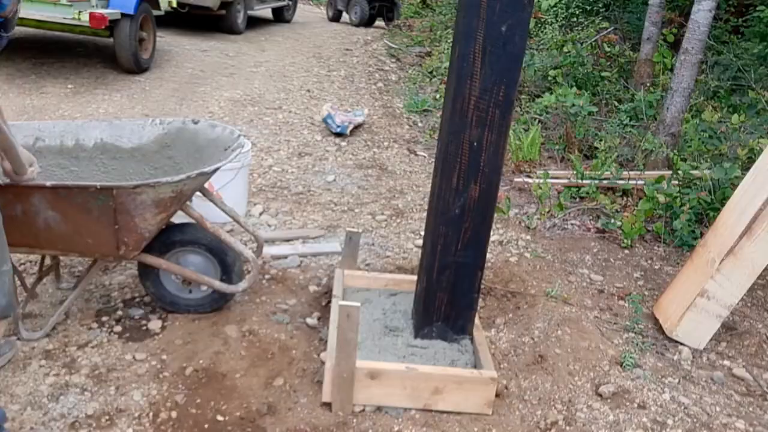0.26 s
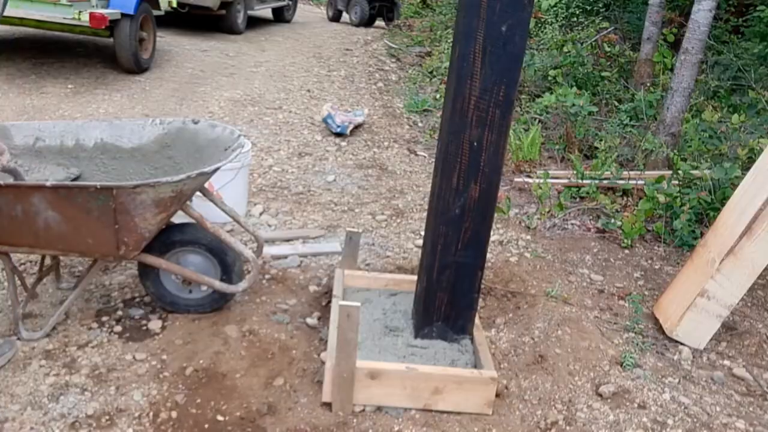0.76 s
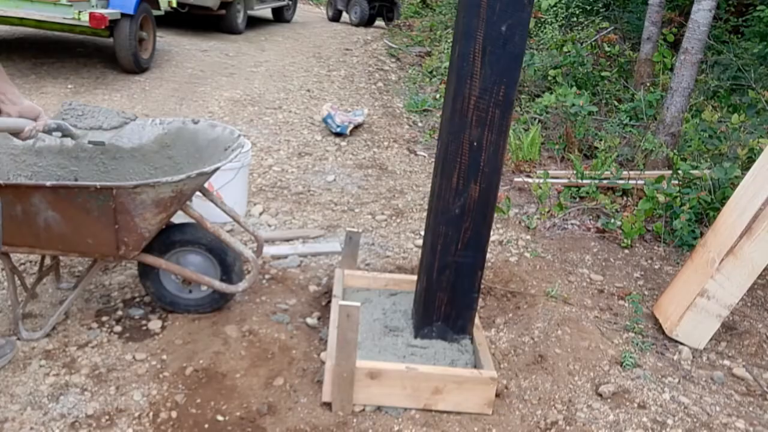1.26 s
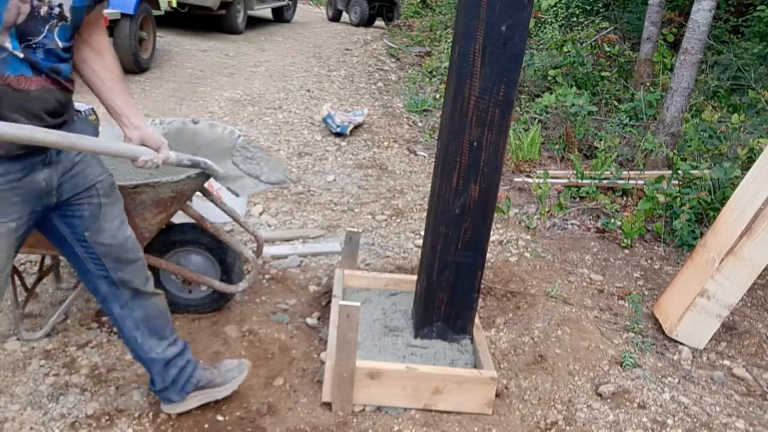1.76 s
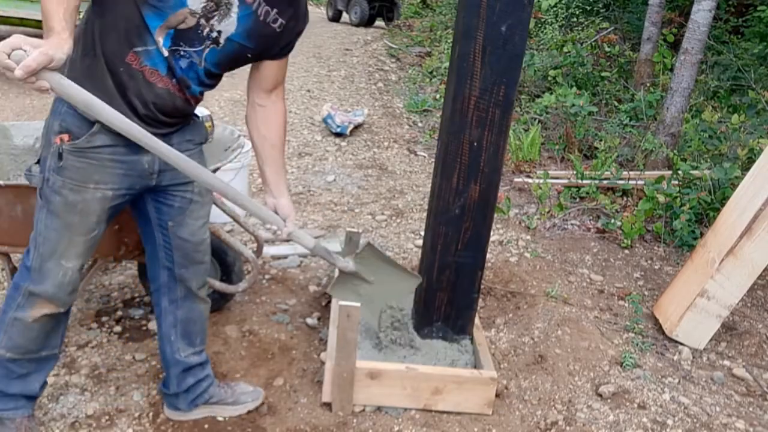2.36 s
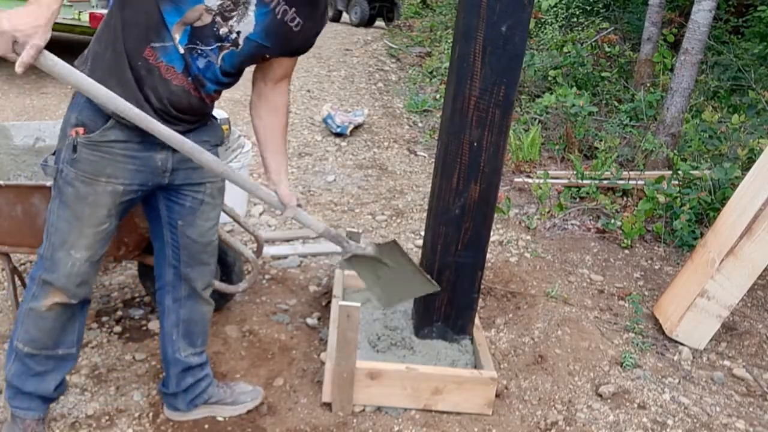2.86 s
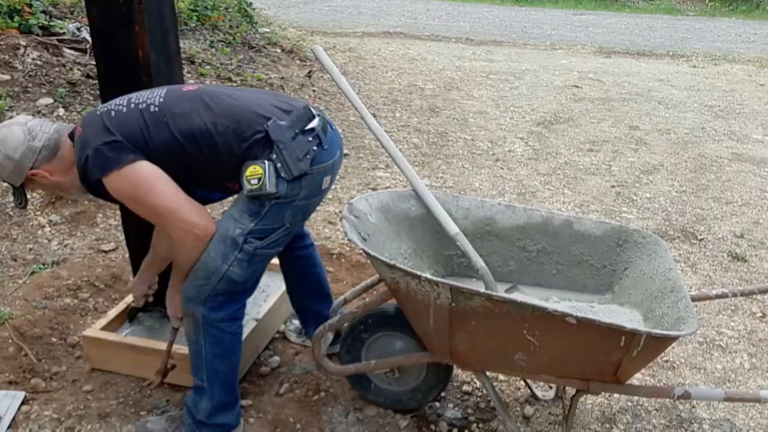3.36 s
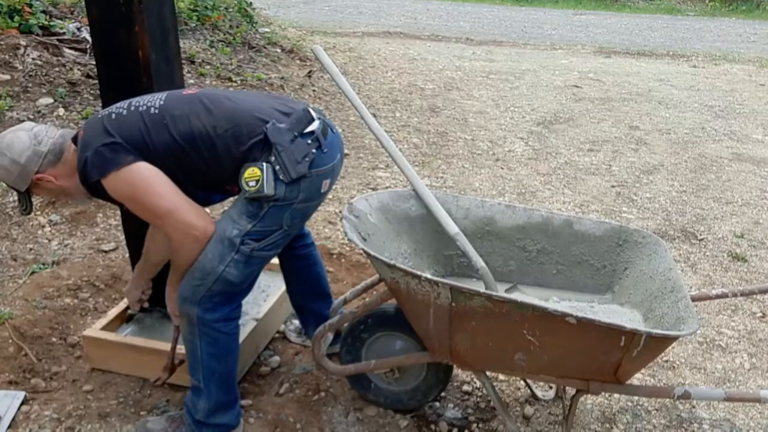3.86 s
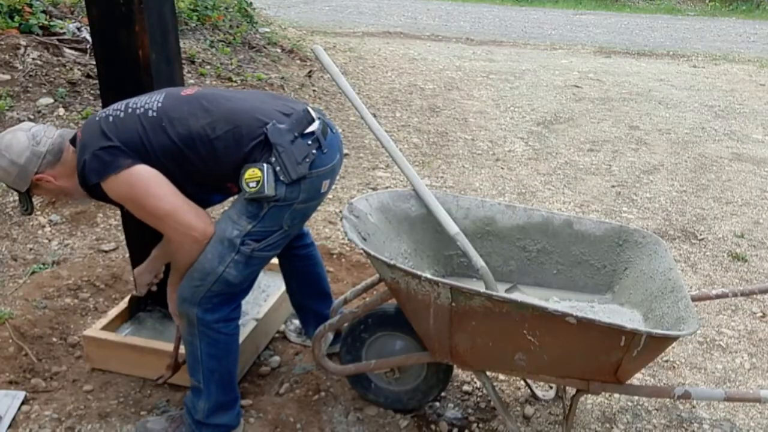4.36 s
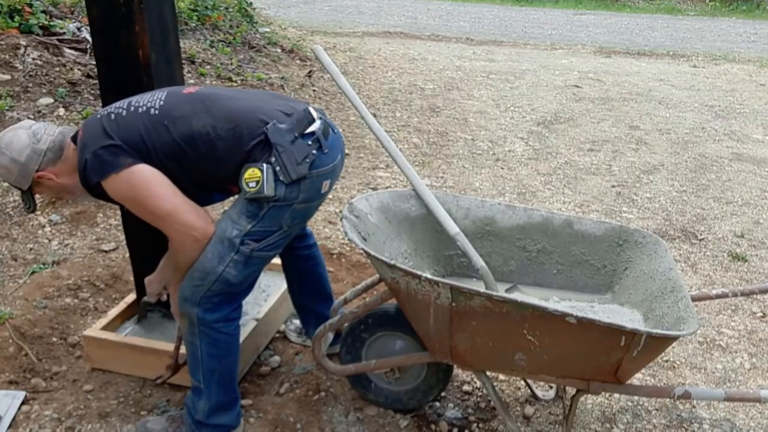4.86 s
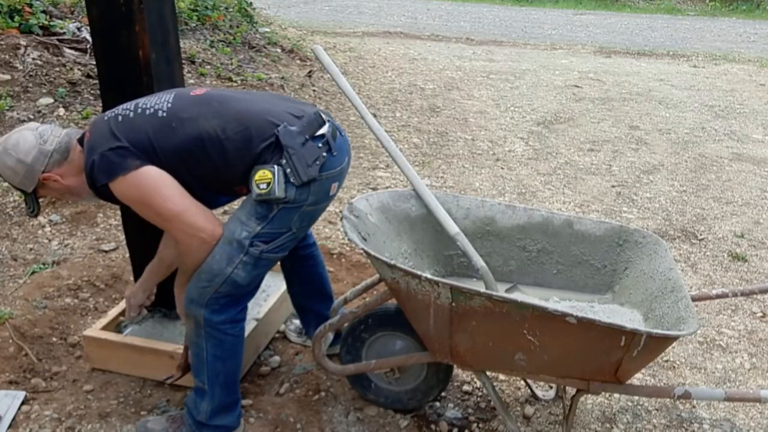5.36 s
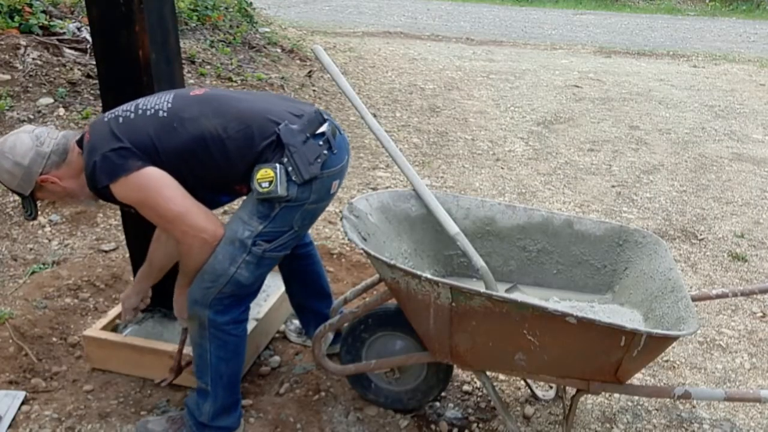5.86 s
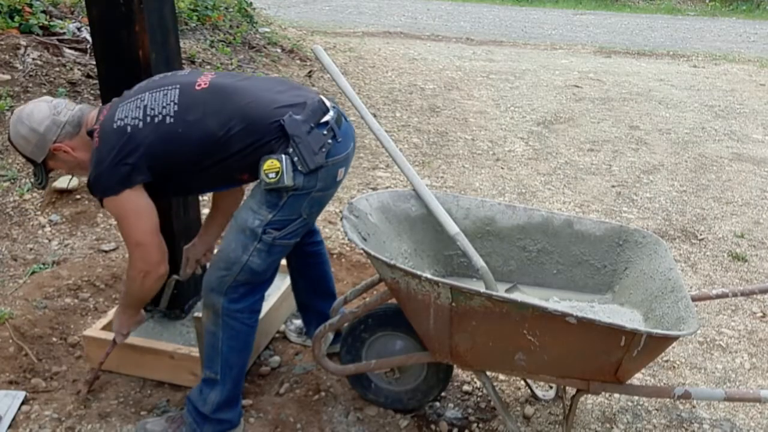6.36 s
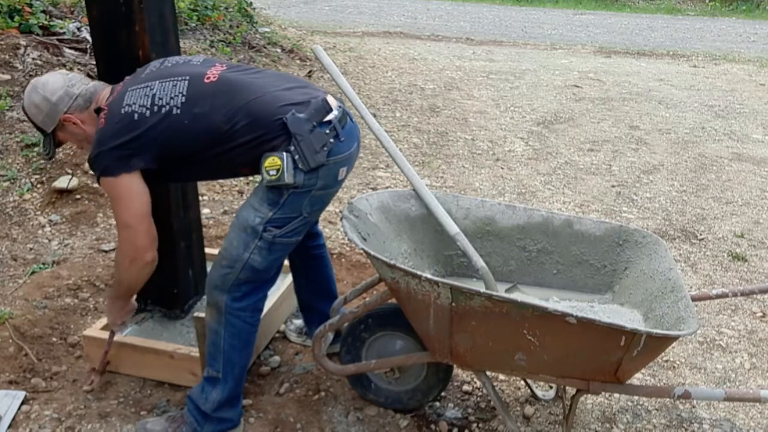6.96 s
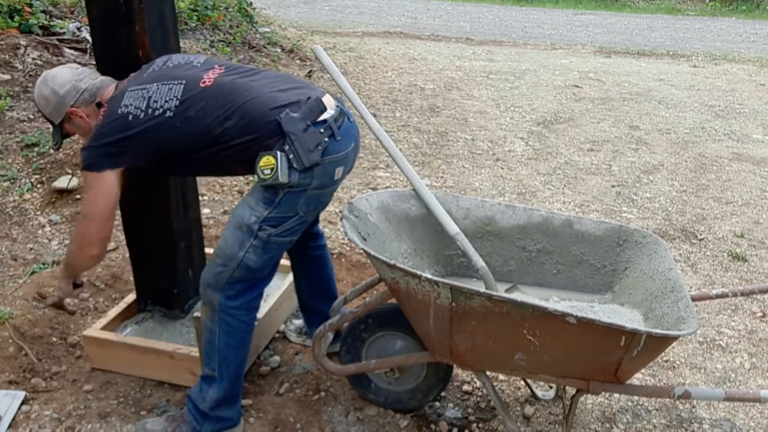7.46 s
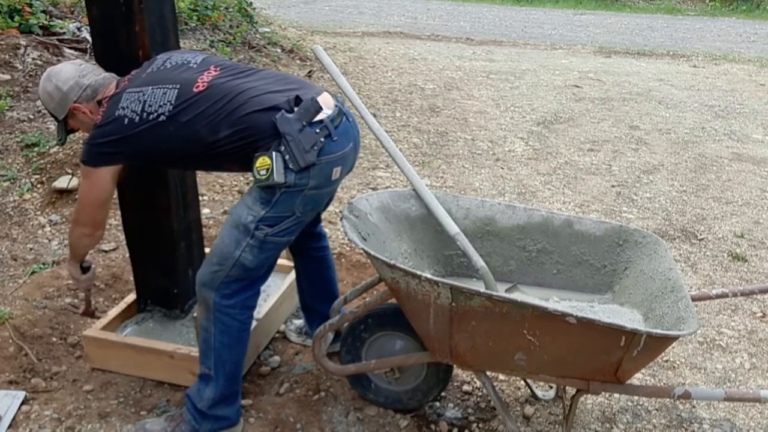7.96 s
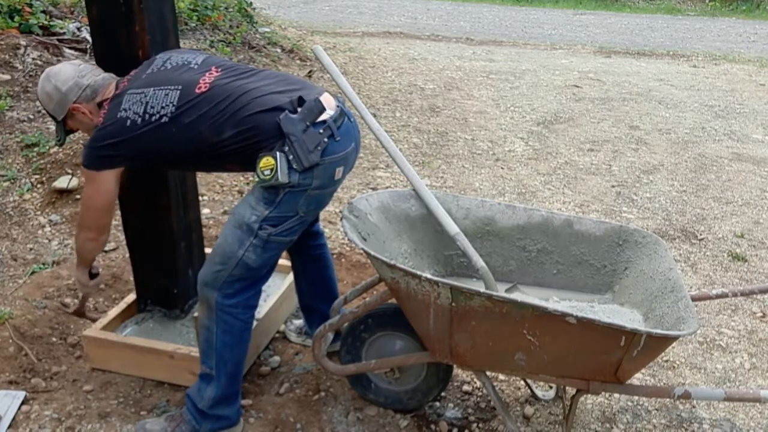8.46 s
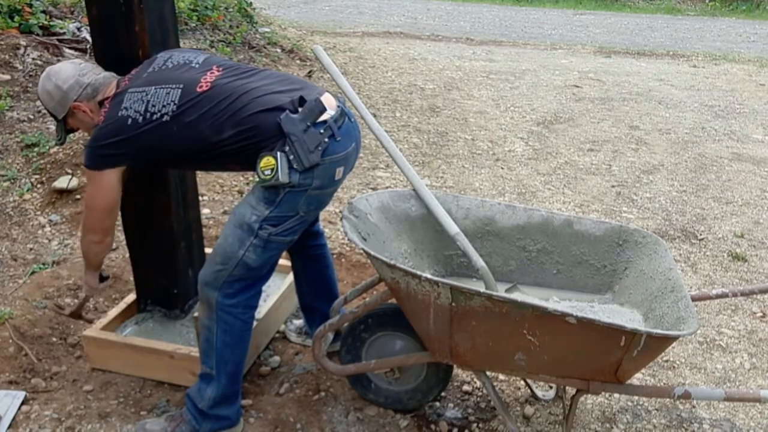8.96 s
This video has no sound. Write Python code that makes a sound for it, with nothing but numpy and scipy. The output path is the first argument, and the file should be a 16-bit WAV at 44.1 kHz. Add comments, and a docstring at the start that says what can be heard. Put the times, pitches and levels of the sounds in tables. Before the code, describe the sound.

Outdoors, close to the work, over a steady soft background noise. From 0 to 2 s a shovel digs wet concrete in a steel wheelbarrow: two gritty, boomy pushes at once, dull knocks around 0.6-0.9, scattered stone ticks, wet slops, and a sharp scrape at 1.8. Low wind puffs buffet the microphones, strongest near 2.3 and 3.15. The load slides off wetly around 2.3-2.5; the blade grates and clanks brightly at 3.1-3.27. At 3.4 the position changes abruptly, wind stops and a faint far engine hums. A steel bar stirs until about 6.1 in quick sandy hisses with coarse rattles and ticks, sparser near 5. It taps a side board from 6.3 to 7.15, five firm, woody knocks about 0.2 apart with a tiny rebound. From 7.75 to 9.1, seven taps on the end board add low thuds and occasional faint ringing. Short echoes follow; the hum swells slightly.

```python
"""Wet concrete work outdoors, heard from two positions. First a shovel digs in a steel wheelbarrow, with wind:
shaped noise rubs and booms, the load slides off and contact noise rings modes of the blade in the form.
Then a far engine hums in sine partials and a steel bar is stirred in the mix: noise strokes hiss and rattle.
Last, the bar taps two boards of the wooden form: short blows excite damped modes, the second board with thuds.
Steady noise lies under all; nearby trees and ground return short echoes as decaying noise tails."""
import sys
import numpy as np
from scipy import signal
from scipy.fft import rfft, irfft, next_fast_len
from scipy.io import wavfile
from scipy.ndimage import uniform_filter1d, map_coordinates

SR = 44100
rng = np.random.default_rng(int(sys.argv[2]) if len(sys.argv) > 2 else 0)


def pcm_store(signal):
    """Save signal as 16-bit PCM."""
    levels = np.round(np.clip(np.atleast_2d(signal), -1, 1) * 32767)
    wavfile.write(sys.argv[1], SR, levels.astype(np.int16).T)


N = 405279

CUT = 3.39  # the listening position changes here (s)
# Wet, heavy body of the mix: f/Hz, relative spectral density/dB
SLOP = [(90, -29), (170, -8), (240, -7.5), (380, -16.5), (800, -64)]
# Taps on the end board: t/s, blow level before the board/dB, nominal ring of the bar relative to the blow/dB
END_TAPS = [(7.741, -13.5, -60), (7.99, -11, -66), (8.22, -15, -53), (8.429, -13.5, -54), (8.64, -15, -48),
            (8.862, -12.5, -40.5), (9.1, -17, -51.5)]


def amp(db):
    """Level law: amplitude ratio of a level in dB."""
    return 10 ** (np.asarray(db) / 20)


def unit(x):
    """Normalisation by energy: x at rms 1."""
    return x / np.sqrt(np.mean(x ** 2) + 1e-20)


def along(points, hz):
    """Interpolation on a logarithmic pitch axis of (f/Hz, value) points."""
    f, v = np.transpose(points)
    return np.interp(np.log(hz + 1), np.log(f + 1), v)


def curves(rows):
    """Linear interpolation in time: one curve for each column, -120 outside the table."""
    s, *cols = np.transpose(rows)
    return [np.interp(np.arange(N) / SR, s, c, -120, -120) for c in cols]


def wobble(rate):
    """Band-limited random modulation: a smooth curve with rate knots a second."""
    knots = rng.standard_normal(int(N * rate / SR) + 4)
    return map_coordinates(knots, [np.arange(N) * rate / SR])


def filtered(x, response):
    """Convolution theorem: the spectrum of x times a complex frequency response."""
    m = next_fast_len(N + SR // 2)
    return irfft(rfft(x, m) * response(np.fft.rfftfreq(m, 1 / SR)), m)[..., :N]


def coloured(x, spectrum):
    """Minimum-phase filtering: x through the causal filter of this spectrum, energy gain 1."""
    size = 4096
    magnitude = amp(along(spectrum, np.fft.rfftfreq(size, 1 / SR)))
    cepstrum = irfft(np.log(magnitude + 1e-5))
    cepstrum[1:size // 2] *= 2  # fold the cepstrum onto positive time
    cepstrum[size // 2 + 1:] = 0
    h = irfft(np.exp(rfft(cepstrum)))
    return signal.fftconvolve(np.atleast_2d(x), h[None] / np.linalg.norm(h), axes=1)[:, :N]


def resonances(modes):
    """Modal superposition: summed damped resonators (f/Hz, width/Hz, level/dB) of alternating sign."""
    def response(f):
        return sum((-1) ** k * amp(db) * 1j * f * width / (centre ** 2 - f * f + 1j * f * width)
                   for k, (centre, width, db) in enumerate(modes))
    return response


def spread(a, b):
    """Interaural coherence: two signals mixed to a stereo pair that is less alike in the treble."""
    # Coherence of the pair: f/Hz, left-right correlation
    alike = [(200, .98), (2000, .92), (12000, .55)]

    def mid_side(hz):
        turn = np.arccos(np.clip(along(alike, hz), -1, 1)) / 2
        return np.array([np.cos(turn), np.sin(turn)])
    mid, side = filtered(np.array([a, b]), mid_side)
    return np.array([mid + side, mid - side])


def friction(gain, spectrum, grains, share, spread_db, flutter_db):
    """Granular friction: fluttering hiss plus uneven single catches (grains a second), under a gain curve."""
    sizes = amp(spread_db * np.minimum(rng.exponential(size=N), 3))
    catch = (rng.random(N) < np.clip(grains / SR, 0, 1)) * sizes
    hiss = amp(flutter_db * wobble(60)) * rng.standard_normal((2, N))
    rub = [unit(h) + share * unit(catch * np.sign(h)) for h in hiss]
    return coloured(gain * unit(spread(*rub)), spectrum)


def bursts(times, level_db, t60):
    """Exponential decay: a dying noise burst for each time, 60 dB down after t60 seconds."""
    out, t = np.zeros((2, N + SR)), np.arange(SR // 5) / SR
    for s, db in zip(times, level_db):
        burst = amp(db - 60 * t / t60) * rng.standard_normal((2, len(t)))
        out[:, round(s * SR):][:, :len(t)] += burst
    return spread(*out[:, :N])


def strokes(rows, rise, fall, arch_db):
    """Envelope energy sum: arched strokes (start/s, length/s, level/dB) that rise and fall in dB per second."""
    t = np.arange(0, N, 16) / SR
    start, length, db = np.transpose(rows)[:, :, None]
    inside = np.clip(2 * (t - start) / length - 1, -1, 1)  # -1 at the start, 1 at the end
    before, after = np.clip(start - t, 0, 1), np.clip(t - start - length, 0, 1)
    shape_db = -arch_db * inside ** 2 - rise * before - fall * after
    return np.interp(np.arange(N) / SR, t, np.linalg.norm(amp(db + shape_db), axis=0))


def patchy(x, depth_db):
    """Time-frequency modulation: the colour of x shifts in random patches of pitch and time."""
    z = signal.stft(x, nperseg=256)[2]
    field = uniform_filter1d(rng.standard_normal(z.shape[-2:]), size=5, axis=0)
    field = uniform_filter1d(field, size=12, axis=1)
    return signal.istft(z * amp(depth_db * unit(field)), nperseg=256)[1][..., :N]


def background():
    """Broadband noise and summed partials: steady background noise with hiss, then a far engine's unsteady hum."""
    # Colour of the background noise: f/Hz, relative spectral density/dB
    noise_spectrum = [(20, -43), (85, -11.5), (255, -24), (620, -22.5), (900, -37), (16000, -46.5)]
    # Partials of the engine: f/Hz, level before the swell/dB
    partials = [(86.1, -72), (172.3, -71), (258.4, -69), (344.5, -75)]
    # Slow swell of the hum: t/s, gain/dB
    swell = [(3.4, -32), (3.7, 1), (5.4, 0.5), (5.8, -9.5), (7.4, -8), (7.7, 2), (9.2, 13.5)]
    drift = np.cumsum(1 + 0.002 * wobble(1.4)) / SR  # one clock, so that the partials drift together
    hum = sum(amp(db + 1.6 * wobble(8.7)) * np.sin(2 * np.pi * (hz * drift + rng.random()))
              for hz, db in partials)
    noise = unit(coloured(spread(*rng.standard_normal((2, N))), noise_spectrum))
    noise *= amp(1.5 * (np.arange(N) < CUT * SR))  # louder at the first position
    noise_db = -76 + wobble(5.7)
    return amp(noise_db) * noise + amp(curves(swell)[0]) * hum


def wind():
    """Turbulent pressure at the microphones: short puffs over a gusty breeze, stronger on the right."""
    # Puffs: centre t/s, level before the left-right gains/dB
    puffs = [(0.952, -46.5), (1.45, -41), (1.755, -55.5), (2.05, -52.5), (2.261, -36.5), (2.75, -50),
             (2.937, -46), (3.153, -35.5)]
    # Colour of the turbulence: f/Hz, relative spectral density/dB
    buffet = [(20, -30), (42, -5.5), (60, -3.5), (100, -10.5), (160, -54)]
    puff_s = 0.02  # between the rise and the fall
    puff = strokes([(s - puff_s / 2, puff_s, db) for s, db in puffs], rise=360, fall=490, arch_db=5.0)
    breeze = amp(-60.5 + 4 * wobble(42)) * (np.arange(N) < CUT * SR)  # at the first position only
    common, own = rng.standard_normal(N), rng.standard_normal((2, N))
    turbulence = unit(coloured(common + 0.9 * own, buffet))
    return (puff + breeze) * amp([[-4], [3]]) * turbulence


def shovel():
    """Friction and impact: the blade cuts hissing slurry, the tub booms, lumps slop, stones tick, steel strikes."""
    # The mix slides on the blade: t/s, level/dB
    sliding = [(.15, -62.5), (.24, -77.5), (.45, -71), (.6, -54.5), (.925, -62), (.945, -93.5),
               (1.75, -76.5), (1.86, -54), (2.1, -73.5), (2.3, -48), (2.46, -51), (2.65, -78.5),
               (3.07, -66), (3.38, -51)]
    # Pushes of the blade: start t/s, length/s, grit level/dB, boom over grit/dB
    digs = [(0.005, 0.049, -45, 12.5), (0.057, 0.071, -51.5, 12.5), (0.331, 0.08, -64.5, 11),
            (0.684, 0.21, -74.5, 16.5), (1.271, 0.036, -65.5, 4.5), (1.366, 0.043, -52.5, 4.5),
            (1.823, 0.0099, -30.5, -12.5), (2.306, 0.047, -43.5, -27), (2.366, 0.071, -43.5, -6)]
    # Dull knocks of the blade: t/s, level before colouring/dB
    knock_rows = [(0.635, -28.5), (0.815, -33.5), (0.85, -30), (0.861, -37), (0.905, -35), (0.921, -45),
                  (1.049, -52.5), (1.078, -53.5), (2.139, -49.5), (2.188, -42), (2.331, -36)]
    # Single stones tick: t/s, level before colouring/dB
    stones = [(0.3357, -44.5), (0.383, -45.5), (0.501, -44), (0.5462, -41), (0.584, -39), (0.697, -42.5),
              (0.841, -41), (1.017, -60), (1.283, -45), (1.4015, -39.5), (1.471, -41), (1.562, -52),
              (1.616, -55.5), (1.686, -49), (2.4281, -33.5), (2.54, -47)]
    # Wet lumps slop: start t/s, level/dB
    lumps = [(0.256, -50), (0.341, -54.5), (0.704, -46), (1.373, -54), (2.32, -49.5)]
    # The blade grates: start t/s, end t/s, level/dB
    grates = [(3.084, 3.113, -33), (3.097, 3.143, -24.5), (3.211, 3.263, -34.5), (3.266, 3.282, -31.5),
              (3.368, 3.385, -42)]
    # Colours of wet grit, tub and blade, each: f/Hz, relative spectral density/dB
    slurry_spectrum = [(400, -32), (800, -20), (2000, -11), (5000, -17), (15500, -26.5)]
    tub_spectrum = [(120, -30), (380, -11), (500, -6.5), (800, -13.5), (1500, -23.5), (3000, -61.5)]
    steel = [(150, -27.5), (600, -14.5), (1360, -12), (2260, -7), (3400, -12.5), (8450, -14), (16000, -29)]
    in_tub_until, tub_db, clear_db = 2.1, 5, -28.5  # s; boom over the sliding in the tub and clear of it
    lump_s, knock_t60, knock_grit_db = 0.096, 0.041, -18  # s, s, gain of the knocks' grit beside their boom

    def moves(rows):
        return strokes(rows, rise=2100, fall=690, arch_db=1.5)

    slide = amp(curves(sliding)[0])
    grit = np.linalg.norm([slide, moves([row[:3] for row in digs])], axis=0)
    slurry = friction(grit, slurry_spectrum, grains=150, share=0.39, spread_db=2.0, flutter_db=2.5)

    drone = slide * amp(np.where(np.arange(N) < in_tub_until * SR, tub_db, clear_db))
    boom_rows = [(s, length, db + over) for s, length, db, over in digs]
    boom = np.linalg.norm([drone, moves(boom_rows)], axis=0)
    tub = friction(boom, tub_spectrum, grains=200, share=0.67, spread_db=3, flutter_db=5)

    slop_gain = moves([(s, lump_s, db) for s, db in lumps])
    slop = friction(slop_gain, SLOP, grains=60, share=0.51, spread_db=-5.0, flutter_db=3)
    grating = strokes([(a, b - a, db) for a, b, db in grates], rise=16000, fall=5400, arch_db=0.5)
    blade = friction(grating, steel, grains=1200, share=0.4, spread_db=0.5, flutter_db=5)

    knocks = bursts(*np.transpose(knock_rows), knock_t60)
    ticks = bursts(*np.transpose(stones), 0.019)
    gritty = coloured(ticks + amp(knock_grit_db) * knocks, slurry_spectrum)
    dull = coloured(knocks, tub_spectrum)
    return patchy(slurry + tub, depth_db=3.0) + slop + blade + clanks() + gritty + dull


def clanks():
    """Position-dependent modal excitation: gritty contacts ring the blade, most near the struck spot's pitch."""
    # Strikes of the blade: t/s, contact level before the modes/dB, pitch that this spot favours f/Hz
    hits = [(3.104, 2.5, 1900), (3.108, -3, 1910), (3.1365, 7, 2310), (3.139, 1.5, 599), (3.1451, 6, 3130),
            (3.149, -3, 1719), (3.222, -6.5, 1420), (3.269, -7.5, 1903)]
    # Modes of the blade: f/Hz, width/Hz, level before the spot's weighting/dB
    blade_modes = [(600, 140, 7.5), (1550, 100, 3), (1850, 87, 1.5), (2130, 130, 3), (2949, 510, -1),
                   (4260, 470, -1.5), (7400, 1300, -2)]
    contact_t60, favour_db = .017, 7  # s, loss for each octave from the favoured pitch
    out, t = np.zeros((2, N + SR)), np.arange(SR // 10) / SR
    hz_axis = np.fft.rfftfreq(len(t), 1 / SR)
    for s, db, favoured in hits:
        modes = [(hz, width, level - favour_db * abs(np.log2(hz / favoured)))
                 for hz, width, level in blade_modes]
        contact = amp(db - 60 * t / contact_t60) * rng.standard_normal((2, len(t)))
        clank = irfft(rfft(contact) * resonances(modes)(hz_axis), len(t))
        out[:, round(s * SR):][:, :len(t)] += clank
    return spread(*out[:, :N])


def stirring():
    """Granular friction: sand hisses along the bar at each stroke over a coarser rattle, with sharp gritty ticks."""
    # Strokes of the bar: start t/s, length/s, level/dB
    stir = [(3.4, 0.048, -44), (3.44, 0.068, -39), (3.54, .1, -33), (3.672, 0.1, -40), (3.805, 0.11, -35.5),
            (3.92, 0.093, -50), (4.0, 0.06, -39), (4.125, 0.099, -34), (4.25, .15, -44.5),
            (4.465, .02, -45.5), (4.487, 0.06, -32.5), (4.58, 0.086, -42.5), (4.812, 0.051, -46),
            (4.955, .05, -54), (5.152, 0.083, -39), (5.25, 0.14, -36), (5.385, .11, -35), (5.55, 0.14, -48),
            (5.7, 0.075, -34), (5.81, 0.078, -49.5), (5.905, .09, -48), (6.04, .1, -52.5)]
    # The bar drags over coarse stones: start t/s, length/s, level/dB
    rasps = [(3.56, 0.08, -40.5), (4.16, 0.18, -38), (4.49, 0.08, -41.5), (5.44, 0.054, -40)]
    # Sharp gritty ticks, some at the start of a stroke: t/s, level before colouring/dB
    tick_rows = [(4.138, -41), (4.231, -34.5), (4.277, -36), (4.301, -34.5), (4.485, -31), (4.82, -34.5),
                 (5.155, -31.5)]
    # Colours of sand and coarse rattle, each: f/Hz, relative spectral density/dB
    sand_spectrum = [(700, -40), (2000, -8.5), (5500, -8), (8000, -8.5), (11000, -16), (15800, -9.5)]
    rattle_spectrum = [(120, -31.5), (485, -29.5), (714, -15), (900, -21), (1430, -9.5), (2600, -24.5),
                       (5000, -69)]
    rattle_db = -10.5  # rattle under the sand in a plain stroke
    push = strokes(stir, rise=4500, fall=2600, arch_db=8.0)
    coarse = np.hypot(amp(rattle_db) * push, strokes(rasps, rise=4500, fall=4300, arch_db=5))
    sand = friction(push, sand_spectrum, grains=400, share=0.66, spread_db=4.0, flutter_db=-2.0)
    rattle = friction(coarse, rattle_spectrum, grains=120, share=0.5, spread_db=4.5, flutter_db=5.5)
    ticks = bursts(*np.transpose(tick_rows), 0.062)
    gritty = coloured(ticks, sand_spectrum) + 0.2 * coloured(ticks, rattle_spectrum)
    return patchy(sand + rattle, depth_db=3.5) + gritty + 0.091 * coloured(ticks, SLOP)


def taps(rows, board, contact, gain_db, crack_db, tail_db, ring_db):
    """Impulsive modal excitation: a short blow (contact/s) rings the board, with a crack, a tail and the bar's ring."""
    bar_hz, bar_t60 = 5960, .28  # the bar's own ring (Hz, s)
    out, t = np.zeros(N + SR), np.arange(SR // 2) / SR
    hz_axis = np.fft.rfftfreq(len(t), 1 / SR)
    s, db = np.transpose(rows)[:2]
    for k, peak, level_db in np.broadcast(np.round(s * SR).astype(int), amp(db), ring_db):
        u = t / (contact * amp(rng.normal(0, 1.0)))
        blow = -amp(gain_db) * u * np.exp(1 - u)  # the board moves away first
        # each blow detunes the modes slightly and gives them new strengths
        modes = [(hz * amp(rng.normal(0, 0.23)), width, level + rng.normal(0, 2.7))
                 for hz, width, level in board]
        knock = irfft(rfft(blow) * resonances(modes)(hz_axis), len(t))
        fade = amp(level_db + rng.normal(0, 2.1) - 60 * t / bar_t60)
        phase = 2 * np.pi * bar_hz * t + np.cumsum(rng.normal(0, 0.02, len(t)))
        ring = fade * (1 - np.exp(-t / 0.0071)) * np.sin(phase)
        out[k:][:len(t)] += peak * (knock + ring)
    # a noise tail: the surroundings answer the taps
    tail = filtered(bursts(s, db + tail_db, 0.35), resonances([(2033, 600, 0.0087)]))
    crack_level = db + crack_db + 0.34 * (db - db.max())  # harder blows crack more than in proportion
    crack = filtered(bursts(s, crack_level, 0.021), resonances([(4000, 3800, 0)]))
    return out[:N] + tail + crack


def side_taps():
    """Modal excitation of the side board by taps of the bar."""
    # Taps: t/s, blow level before the board/dB
    rows = [(6.295, -12.5), (6.526, -7), (6.726, -7), (6.935, -6), (7.138, -7.5), (7.175, -22)]
    # Modes of the side board: nominal f/Hz, width/Hz, nominal level/dB
    board = [(176, 67, -3), (422.5, 69, 4), (692, 82, 3.5), (955, 200, -9.5), (1500, 130, -1.5),
             (2450, 570, -7.5)]
    return taps(rows, board, contact=0.0001, gain_db=13.0, crack_db=-24.0, tail_db=-37.0, ring_db=-56.5)


def wall_returns(side):
    """Delayed reflection: nearby surfaces return the low part of the side taps, each in a narrow band."""
    # Reflecting surfaces: delay/s, level/dB, band centre f/Hz
    walls = [(0.036, -26, 418), (.06, -24.5, 404), (.103, -22, 250)]
    width_hz = 120

    def response(hz):
        return sum(amp(db) * resonances([(at, width_hz, 0)])(hz) ** 2 * np.exp(-2j * np.pi * hz * s)
                   for s, db, at in walls)
    return filtered(side, response)


def end_taps():
    """Modal excitation of the end board by taps of the bar."""
    # Modes of the end board: nominal f/Hz, width/Hz, nominal level/dB
    board = [(264, 50, -12), (364.6, 19.7, -8), (569.6, 66, 0), (740.4, 41.4, -0.5), (946, 46, -6),
             (1215, 51, 2), (1880, 730, -9)]
    ring_db = np.transpose(END_TAPS)[2]
    return taps(END_TAPS, board, contact=0.00018, gain_db=13.5, crack_db=-22.5, tail_db=-32, ring_db=ring_db)


def thuds():
    """Low-frequency impulse response: taps on the end board also shake the ground under the form."""
    push = np.zeros(N)
    push[[round((s + .011) * SR) for s, *_ in END_TAPS]] = amp(18.0)  # 11 ms after each tap
    return filtered(push, resonances([(77, 25, 0.0), (170, 30, -6)]))


def echoes(x, delay):
    """Diffuse reverberation: each frequency returned by trees and ground dies at its own speed."""
    # Answer of the trees and ground: f/Hz, t60/s, relative level/dB
    trees = [(100, 0.27, -1.5), (1460, 0.21, -8), (2720, 0.18, -1.5), (14980, 0.016, 4)]
    out, step = np.zeros((2, N + 2 * SR)), SR // 4
    at, t60, db = np.transpose(trees)
    for k in range(0, N, step):  # a new tail for each stretch
        hz, t, z = signal.stft(rng.standard_normal((2, SR // 3)), SR, nperseg=256)
        fade_db = np.interp(hz, at, db)[:, None] - 60 * t / np.interp(hz, at, t60)[:, None]
        tail = signal.istft(z * amp(fade_db), SR, nperseg=256)[1]
        wet = signal.fftconvolve(x[:, k:k + step], tail / np.linalg.norm(tail[0]), axes=1)
        out[:, k + round(delay * SR):][:, :wet.shape[1]] += wet
    return out[:, :N]


def placed(x):
    """Level and time differences: balance leans with frequency, work at the side reaches the left first."""
    # Balance: f/Hz, left-right level difference/dB
    lean_db = [(60, -9.5), (250, -8), (1000, 0), (15000, 2)]
    # The work is straight ahead: from t/s, to t/s
    in_front = [(0, .2), (2.0, CUT)]
    lead_s = .00019  # lead of the left microphone for work at its side
    t, half = np.arange(N) / SR, np.array([[.5], [-.5]])
    front = sum(1. * (t >= a) * (t < b) for a, b in in_front)
    ahead = uniform_filter1d(front, SR // 20, mode="nearest")

    def lean(hz):
        return amp(half * along(lean_db, hz))

    def lean_and_lead(hz):
        return lean(hz) * np.exp(2j * np.pi * hz * half * lead_s)
    return filtered(ahead * x, lean) + filtered((1 - ahead) * x, lean_and_lead)


def scene():
    """Superposition: the work at both listening positions with echoes, wind and background."""
    side = side_taps()
    dig = shovel()
    work = side + wall_returns(side) + end_taps() + thuds() + stirring()
    returned = echoes(amp(-14.5) * dig + amp(-11.0) * work, 0.0036)
    return placed(dig + work) + returned + wind() + background()


def record(dry):
    """Saturation and band limiting: the loudest peaks are rounded off, nothing stays above the limit."""
    top_hz = 15900
    rounded = dry / (1 + np.abs(dry / .85) ** 4) ** (1 / 4)
    return filtered(rounded, lambda hz: hz < top_hz)


dry = scene()
out = record(dry)
pcm_store(out)
```